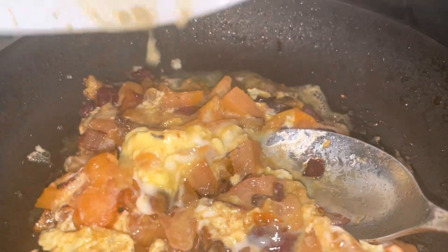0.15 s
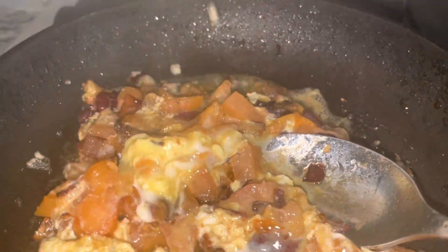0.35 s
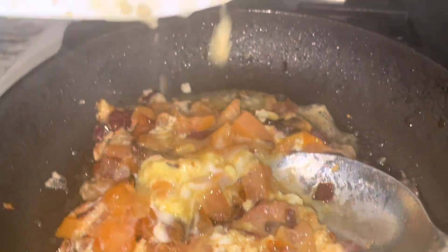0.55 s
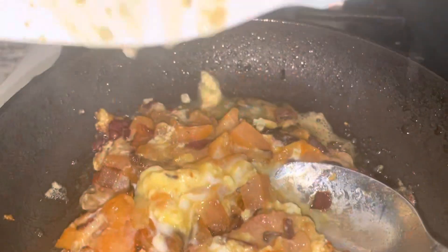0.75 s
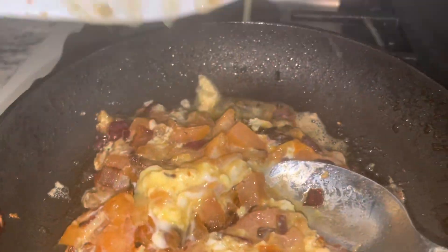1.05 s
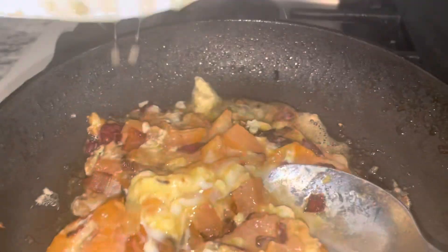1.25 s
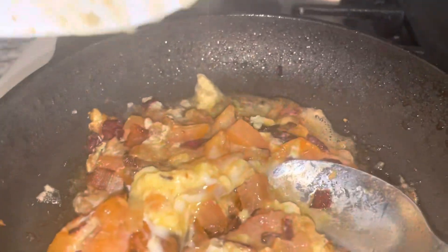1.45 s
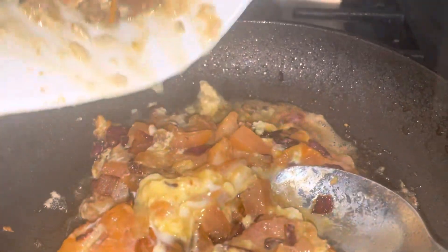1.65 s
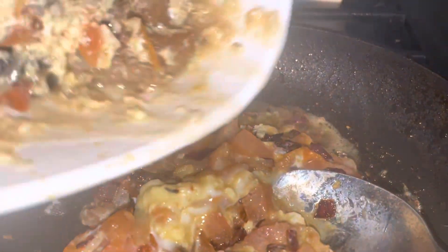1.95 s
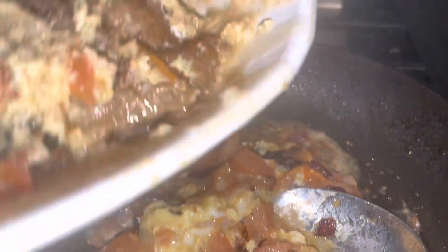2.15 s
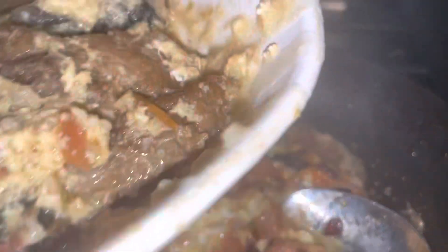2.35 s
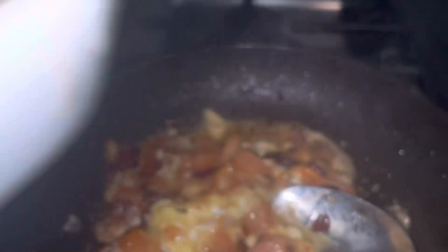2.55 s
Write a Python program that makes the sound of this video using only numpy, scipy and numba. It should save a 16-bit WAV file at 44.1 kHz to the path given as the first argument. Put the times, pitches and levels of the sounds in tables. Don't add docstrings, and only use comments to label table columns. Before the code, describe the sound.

Loud, close frying sizzle, bright and crackling with hard pops, above a low steady fan rush

```python
import sys
import numpy as np
from scipy import signal
from scipy.fft import rfft, irfft
from scipy.io import wavfile
from scipy.ndimage import uniform_filter1d, minimum_filter1d
from numba import njit

SR = 44100
rng = np.random.default_rng(int(sys.argv[2]) if len(sys.argv) > 2 else 0)


def pcm_store(signal):
    levels = np.round(np.clip(np.atleast_2d(signal), -1, 1) * 32767)
    wavfile.write(sys.argv[1], SR, levels.astype(np.int16).T)


def voltage_ratio(decibels):
    exponent = np.asarray(decibels, float) / 20
    return 10 ** exponent


N = 119070
T = np.arange(N) / SR
F = np.fft.rfftfreq(N, 1 / SR)


def unit(x):
    return x / np.sqrt(np.mean(x ** 2))


def line(table, at, col=1):
    table = np.array(table, float)
    return np.interp(at, table[:, 0], table[:, col])


def colour(x, table):
    spectrum = rfft(x)
    hz, level = np.array(table, float).T
    db = np.interp(np.log(F + 1), np.log(hz), level, left=-70)
    usual = np.sqrt(uniform_filter1d(abs(spectrum) ** 2, size=801) + 1e-9)
    return unit(irfft(spectrum * voltage_ratio(db) / usual, N))


def walk(rate):
    k = int(SR / rate)
    steps = np.repeat(rng.standard_normal(N // k + 1), k)
    return 1.35 * uniform_filter1d(uniform_filter1d(steps, k), k)[:N]


def above(hz):
    return np.clip((F - hz) / 120 + .5, 0, 1)


@njit
def rings(n, at, hz, cycles, size, glide):
    y = np.zeros(n + 4000)
    for k in range(len(at)):
        start, step, phase, level = int(at[k] * SR), 2 * np.pi * hz[k] / SR, 0., size[k]
        decay = np.exp(-hz[k] / SR / cycles[k])
        rise = 1 + glide * hz[k] / SR / cycles[k]
        for j in range(min(3900, int(5 * cycles[k] * SR / hz[k]))):
            phase += step
            step = min(step * rise, 2.6)
            level *= decay
            y[start + j] += level * np.sin(phase)
    return y[:n]


@njit
def svf(x, hz, width):
    y, band, low = np.empty(len(x)), 0., 0.
    for i in range(len(x)):
        g, k = np.tan(np.pi * hz[i] / SR), width[i] / hz[i]
        v = (band + g * (x[i] - low)) / (1 + g * (g + k))
        band, low, y[i] = 2 * v - band, low + 2 * g * v, k * v
    return y


def bubbles(count, lo_hz, hi_hz, cycles, spread_db):
    when, pitch, luck, length = rng.random((count, 4)).T
    hz = lo_hz + (hi_hz - lo_hz) * pitch
    spread = spread_db * np.clip(0.4 + hz / 6700.0, 0, 1)
    size = voltage_ratio(-spread * np.log(luck + 0.006))
    return rings(N, when * N / SR * .999, hz, cycles * (0.38 + length) * np.sqrt(hz / 4700.0), size, 0.048)


# (time [s], sizzle level [dB], low bubble level [dB], fan level [dB])
HEAT = [(0.0, -26, -31.5, -26), (0.01, -20, -34, -30), (0.05, -17.5, -29, -23.5),
        (0.22, -16.5, -30.5, -27.5), (0.33, -16.5, -33, -28.5), (0.52, -14.5, -28.5, -27.5),
        (0.64, -14.5, -27.5, -24.5), (0.7, -13, -27, -26.5), (0.82, -14.5, -25, -22.5),
        (0.84, -19, -34.5, -33), (0.91, -17.5, -25, -27), (0.95, -19, -35, -29), (1.08, -12, -20.5, -23.5),
        (1.11, -16.5, -30.5, -29.5), (1.88, -16, -28.5, -28), (1.9, -17, -33.5, -30.5),
        (1.95, -18.5, -25.5, -30.5), (2.0, -19, -28, -27), (2.08, -15.5, -27, -28),
        (2.35, -19, -30.5, -32.5), (2.55, -17, -25, -29), (2.7, -15.5, -25, -31.5)]
# (pitch [Hz], level [dB])
SIZZLE = [(500, -19), (1800, -5.5), (5500, -10.5), (7200, -8.5), (8400, -3.5), (12100, 2), (13500, -5.5),
          (16000, -13.5)]
# (pitch [Hz], width [Hz], lift [dB])
PAN = [
    (6730, 750, 4),
    (10900, 5800, 1.5),
]
# (time [s], pitch [Hz], width [Hz], share of the sizzle [0-2])
BOWL = [
    (0, 3760, 200, .5),
    (.3, 3740, 90, 1.5),
    (.7, 3720, 90, 1.5),
    (1.2, 3700, 150, .5),
    (1.5, 2800, 200, .8),
    (1.9, 2450, 200, 1.2),
    (2.4, 2300, 200, 1.2),
    (2.7, 2300, 250, .6),
]


def sizzle():
    fizz_db, level_db = -2, 4
    x = unit(bubbles(count=9000, lo_hz=560, hi_hz=16460, cycles=1.67, spread_db=3.0))
    flurries = voltage_ratio(1.5 * walk(40.19) + 0.43 * walk(8.76))
    x = colour(x * flurries + voltage_ratio(fizz_db) * rng.standard_normal(N), SIZZLE)

    bowl = svf(x, line(BOWL, T), line(BOWL, T, col=2))
    lift = sum(db * np.exp(-((F - hz) / w) ** 2) for hz, w, db in PAN)
    z = rfft(x + line(BOWL, T, col=3) * bowl) * voltage_ratio(lift)

    low = 1 / (1 + (F / 3200) ** 4)
    heat, deep = line(HEAT, T), line(HEAT, T, col=2)
    deep = deep - np.mean(deep) + np.mean(heat)
    return irfft(z * (1 - low), N) * voltage_ratio(heat + level_db) + irfft(z * low, N) * voltage_ratio(deep + level_db)


# (time [s], level over the limiter ceiling [dB])
POPS = [(0.02, 4.5), (0.1201, 6), (0.1807, 5.5), (0.1911, 8.5), (0.2705, 8), (0.3214, 6), (0.3301, -8),
        (0.6627, 7), (0.6882, 12.5), (0.7418, 9), (0.8539, 7.5), (1.102, 1), (1.107, 3.5), (1.1417, 4),
        (1.183, 3), (1.2157, 6), (1.2499, 1.5), (1.2768, 6.5), (1.3061, 5.5), (1.3221, 7.5), (1.4056, 5.5),
        (1.4416, 6.5), (1.5061, 0), (1.5313, 6.5), (1.6682, 3.5), (1.9757, 6.5), (2.0788, 4), (2.138, -1),
        (2.251, 2.5), (2.3022, 0.5), (2.568, -2), (2.4566, 4), (2.6548, 5)]
# (time [s], level over the limiter ceiling [dB])
MORE_POPS = [
    (.812, -1),
    (.820, 3),
    (.8255, 5.5),
    (1.530, 3.5),
    (1.924, -2),
    (2.580, -2),
    (2.592, 9),
]


def pops():
    at, db = np.array(list(POPS) + list(MORE_POPS), float).T.copy()
    u = rng.random((len(at), 2)).T
    size = voltage_ratio(db - 3.0)
    lower = rings(N, at - .0002, 9000. * voltage_ratio(u[0] - 1.0), 6.8 * (1.0 + u[1]), size, 0.)
    upper = rings(N, at - .0002, 12000. * voltage_ratio(u[1] - 1.0), 6.8 * (1.0 + u[0]), size, 0.)
    return lower + upper


# (time [s], peak level [dB], pitch [Hz])
SPITS = [(0.043, -11, 1260), (0.0784, -1.5, 5050), (0.2189, -2, 3130), (0.3303, -0.5, 2400),
         (0.3506, -14, 3770), (0.4656, -13, 1500), (0.5005, -17, 3740), (0.581, -3.5, 1820),
         (0.6206, -22, 2610), (0.722, 1, 3440), (0.7602, -17, 3670), (0.8966, 0.5, 3550), (1.06, -7, 2460),
         (1.304, -8, 1400), (1.342, -6, 3740), (1.6924, -14, 2410), (1.82, -16, 2540), (0.6, -8, 2140),
         (0.6827, -7, 2010), (1.5767, -10.5, 1340), (2.1047, -6, 5030), (2.4294, -13, 2220),
         (1.08, -8, 2500), (0.529, -1, 6400), (1.949, -15, 2290), (1.9676, -15, 2280), (2.2677, -1.5, 3600),
         (2.377, -11, 1960), (2.454, -17, 1600), (2.6249, -9, 3560)]


def spits():
    at, db, hz = np.array(SPITS, float).T.copy()
    return rings(N, at, hz, 1.3 * np.ones(len(at)), voltage_ratio(db + 1.5), 0.051)


# (time [s], peak level [dB])
CRACKS = [(0.0197, -6), (0.0776, -5), (0.1188, -3), (0.1386, -8), (0.1501, -9), (0.1768, -5.5),
          (0.2353, -1), (0.2523, -4), (0.269, -3), (0.3068, -2.5), (0.3196, 2), (0.339, -8), (0.5463, -2.5),
          (0.686, -1), (0.7113, -7), (0.728, -7), (0.7622, -2), (0.7838, -5), (0.8799, -12), (0.8935, -4),
          (0.9118, -12), (0.9367, -7), (1.0176, -9), (1.1572, -5), (1.2047, -3), (1.27, -4), (1.3049, -5),
          (1.3214, -1), (1.3384, -4), (1.3656, -10), (1.3745, -3.5), (1.4402, -12), (1.458, -20),
          (1.4712, -9), (1.5297, -8), (1.5863, -8.5), (1.6128, -4), (1.8332, -10), (1.923, -1.5),
          (2.0458, -2.5), (2.1793, -9), (2.2715, -4), (2.393, -13), (2.4987, -4.5), (2.6529, -4)]


def cracks():
    level_db, tail_s = -0.5, 0.0016
    env = sum(voltage_ratio(db + level_db) * (T >= s) * np.exp(-np.clip(T - s, 0, .05) / tail_s) for s, db in CRACKS)
    return env * colour(rng.standard_normal(N), SIZZLE)


# (pitch [Hz], level [dB])
RUSH = [(15, -54), (25, -36), (80, -3), (164, -1.5), (249, -1.5), (334, -2.5), (419, -6.5), (659, -12.5),
        (1200, -16), (1560, -9), (2640, -120)]
# (pitch [Hz], level [dB])
HUM = [
    (97, -47),
    (120, -41.5),
    (166, -35),
    (333, -35.5),
    (598, -45),
]


def fan():
    rush = colour(rng.standard_normal(N), RUSH) * voltage_ratio(0.19 * walk(11.45))
    draw = line(HEAT, T, col=3)
    hum = 0
    for hz, db in HUM:
        level = voltage_ratio(db + 2.5 + 1.8 * walk(7.13))
        wavering_hz = hz * (1 + 0.01278 * walk(6.))
        hum = hum + level * np.sin(2 * np.pi * np.cumsum(wavering_hz) / SR)
    return rush * voltage_ratio(draw + 2.5) + hum * voltage_ratio(draw - np.mean(draw))


OPENINGS = [.02, .2, .325, .825, 1.15, 2.59]
# (start [s], end [s])
FILL_LOW = [(.04, .33), (.37, .43), (.58, .69), (.72, .8), (.86, .955), (.975, 1.03), (1.2, 1.24),
            (1.88, 1.93), (1.97, 2.005), (2.04, 2.075)]
# (start [s], end [s])
FILL_HIGH = [(.07, .3), (.35, .38), (.46, .54), (.62, .69), (.73, .76), (.85, .915), (1.42, 1.45),
             (2.09, 2.26), (2.48, 2.63)]


def thin_mid_and_side(mid, side):
    opened_s, narrow_hz = .014, 12500
    opened = np.clip(sum(np.exp(-((T - s) / opened_s) ** 4) for s in OPENINGS), 0, 1)

    def removed(z, left_db):
        return irfft(z, N) * (1 - opened) * (1 - voltage_ratio(left_db))

    def edge_db(spans, fill_db):
        fill = uniform_filter1d(sum(1. * (T > a) * (T < b) for a, b in spans), size=500)
        return -26 + fill_db * fill + 2 * walk(11.)

    e = [above(hz) for hz in (7850, 8350, 9050, 9650)]
    narrowed = above(narrow_hz)
    new_mid = irfft(mid, N) - removed(mid * (e[1] - e[2]), -34)
    new_mid -= removed(mid * (e[0] - e[1]), edge_db(FILL_LOW, 34))
    new_mid -= removed(mid * (e[2] - e[3]), edge_db(FILL_HIGH, 27))
    new_side = irfft(side, N) - removed(side * narrowed, -30)
    new_mid += opened * voltage_ratio(-15) * irfft(side * (e[0] - e[3]), N)
    new_side += opened * voltage_ratio(-7) * irfft(mid * narrowed, N)
    return new_mid, new_side


# (pitch [Hz], phase [radians])
LEAD = [(0, 0), (600, 0.4), (1700, -1.4), (4400, -0.96), (6000, 0.67), (8400, 3.5), (10000, 4.0),
        (13100, 5.5)]
# (pitch [Hz], likeness [0-1])
ALIKE = [(300, 1.68), (700, 0.06), (1200, .95), (3000, 0.85), (7000, 0.3), (8400, 1.2), (10500, 2),
         (13500, 2)]
# (pitch [Hz], level [dB])
TILT = [(200, -1), (700, 2.5), (2200, -1.3), (4300, 10), (5900, 2), (7400, 0.5), (8400, -1.5)]


def ports(x, echo):
    alike = np.clip(line(ALIKE, F), 0, .955)
    turn = np.exp(.5j * line(LEAD, F))
    shared = rfft(x) * np.sqrt((1 + alike) / 2)
    apart = rfft(echo) * np.sqrt((1 - alike) / 2)
    kept = 1 - above(15800)
    g = voltage_ratio(line(TILT, F) / 2) * kept
    left = (shared + apart) / turn * g
    right = (shared - apart) * turn / (g + 1e-9) * kept ** 2
    mid, side = thin_mid_and_side((left + right) / 2, (left - right) / 2)
    return np.array([mid + side, mid - side])


def scene():
    hits = pops() + spits() + cracks()
    return ports(sizzle() + hits + fan(), sizzle() + np.roll(hits, 31) + fan())


@njit
def hold(x, fall):
    y, e = np.empty(len(x)), 0.
    for i in range(len(x)):
        e = max(x[i], e + (x[i] - e) * fall)
        y[i] = e
    return y


def roll_off(x):
    return signal.sosfilt(signal.butter(12, 15870, fs=SR, output="sos"), x)


def record(dry):
    ceiling, release_s, ahead_s = 1, 0.035, 0.00046
    k = int(ahead_s * SR)
    need_db = np.maximum(20 * np.log10(abs(dry).max(axis=0) / ceiling + 1e-9), 0)
    need_db = -minimum_filter1d(-need_db, 2 * k + 1)
    gain = voltage_ratio(-uniform_filter1d(hold(need_db, 1 / (release_s * SR)), k))
    return roll_off(np.clip(dry * gain, -1, 1))


dry = scene()
out = record(dry)
pcm_store(out)
```